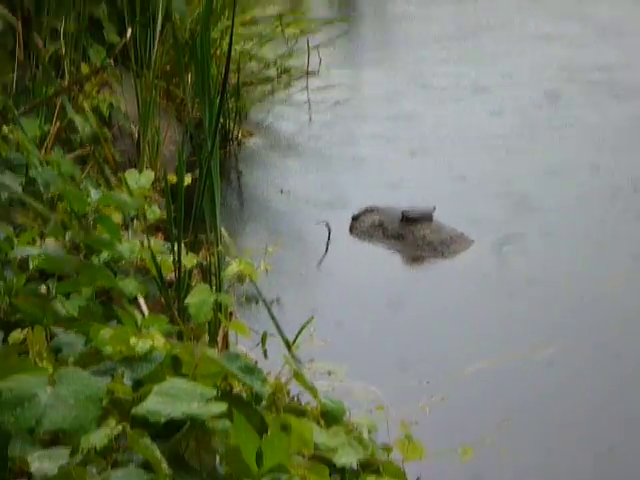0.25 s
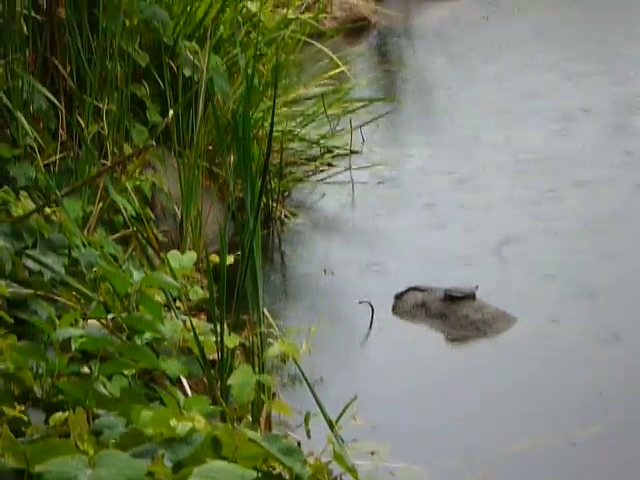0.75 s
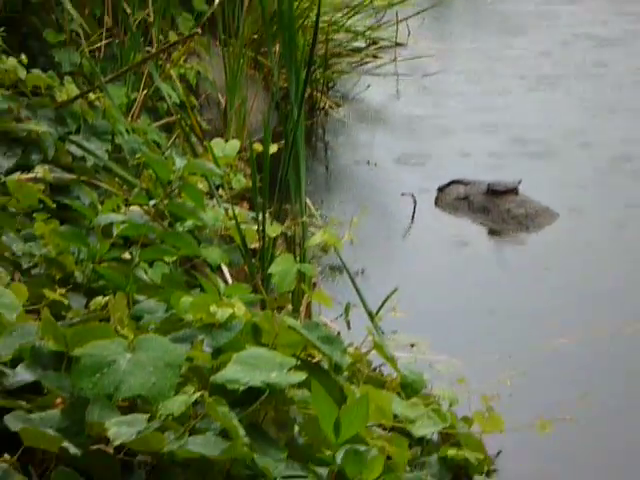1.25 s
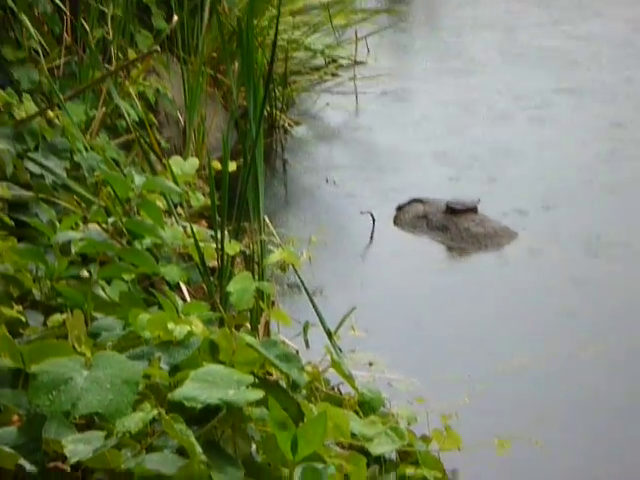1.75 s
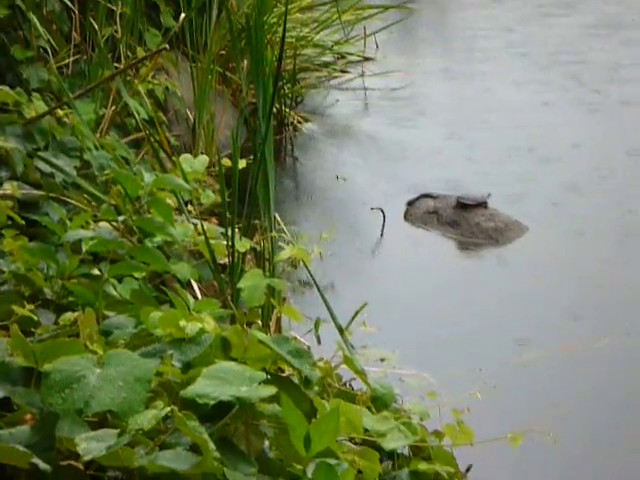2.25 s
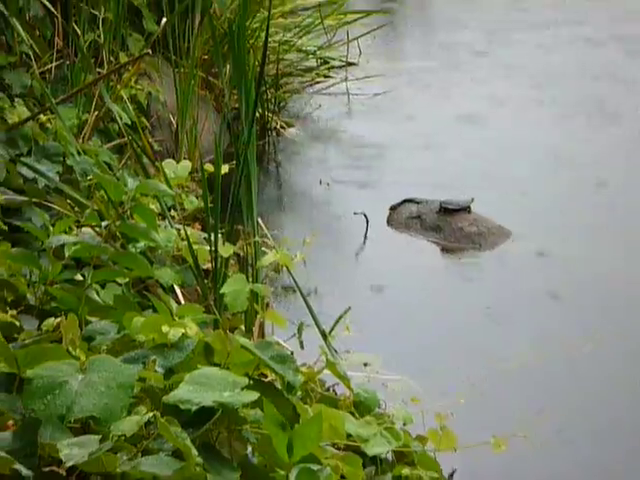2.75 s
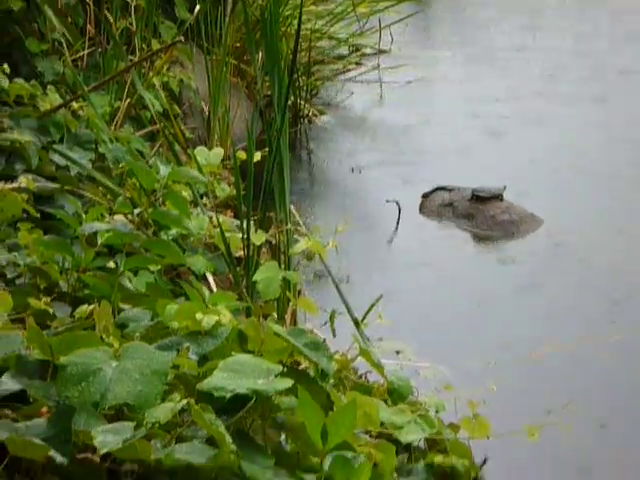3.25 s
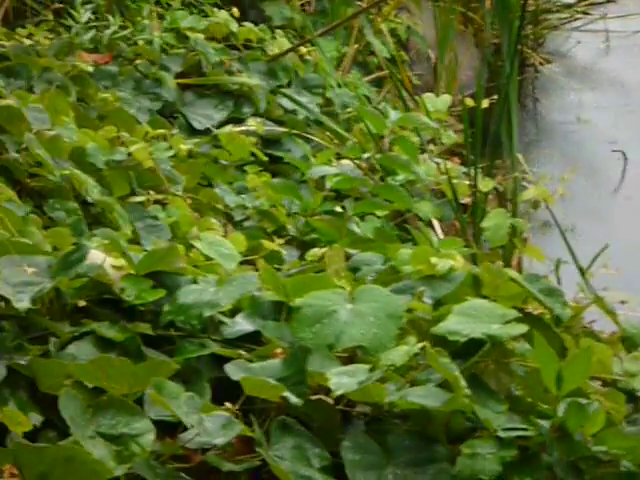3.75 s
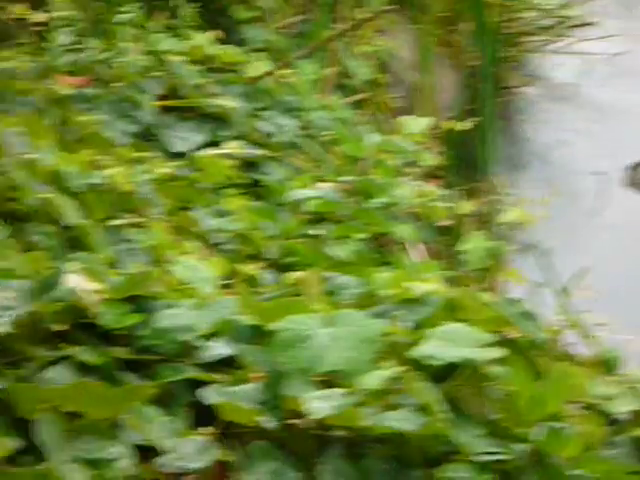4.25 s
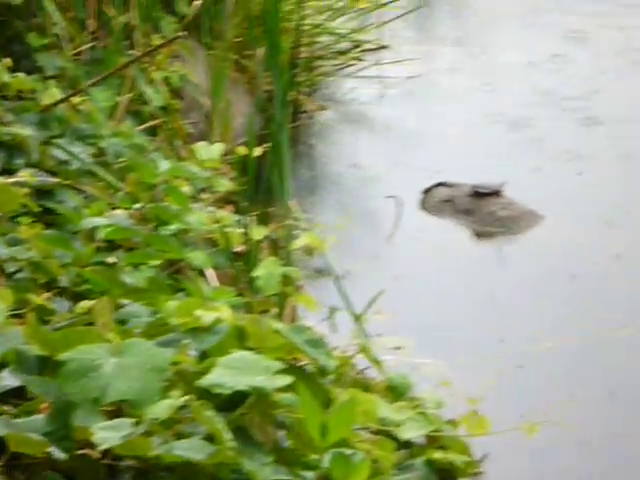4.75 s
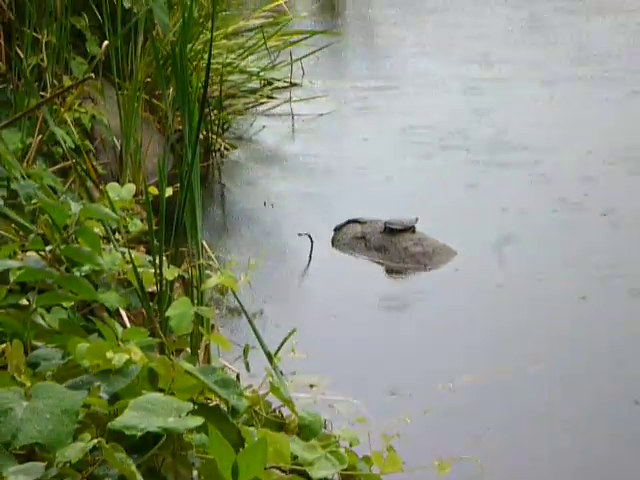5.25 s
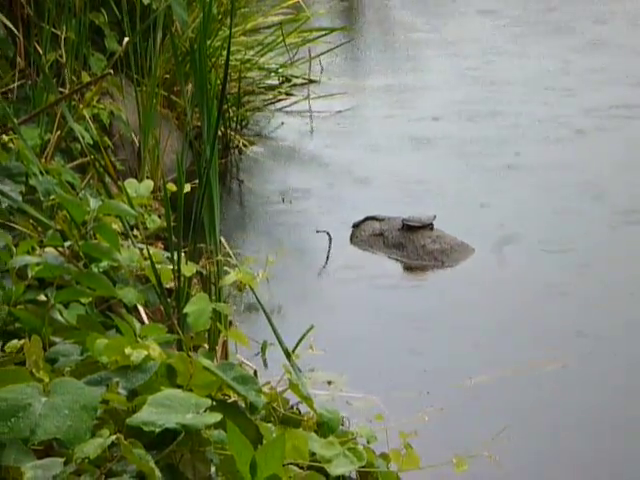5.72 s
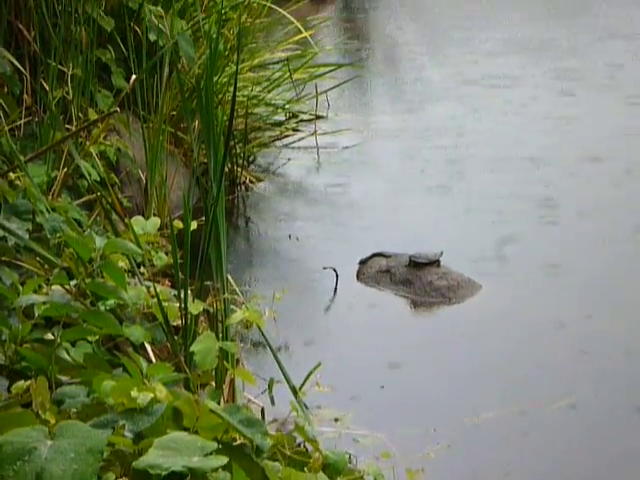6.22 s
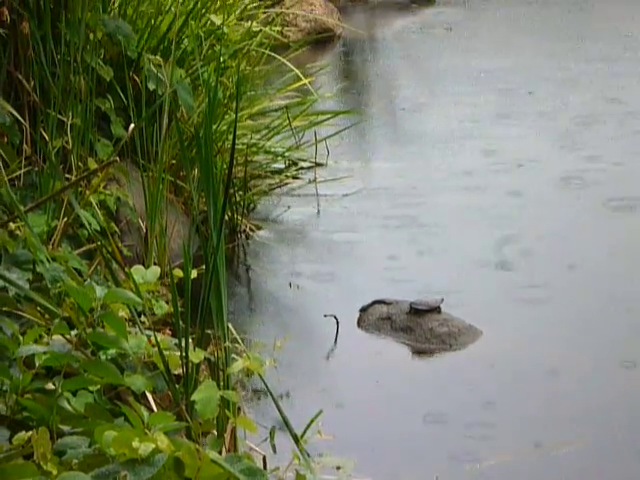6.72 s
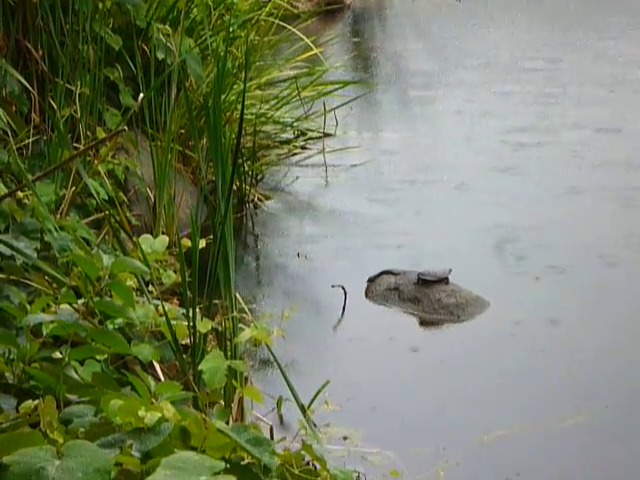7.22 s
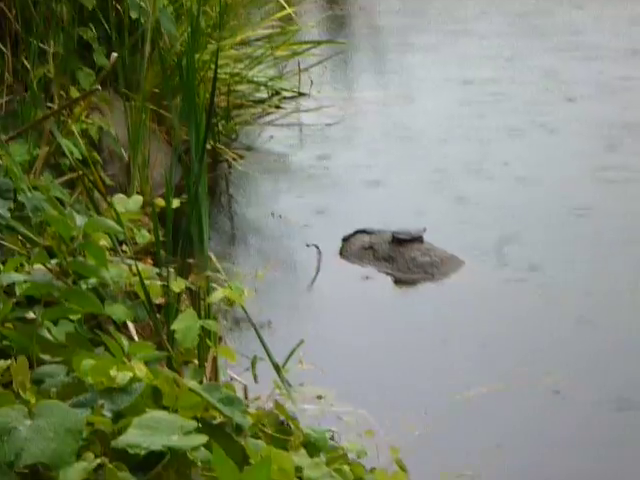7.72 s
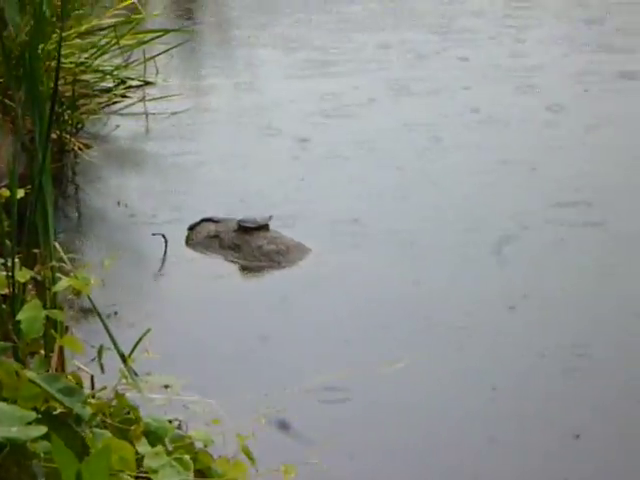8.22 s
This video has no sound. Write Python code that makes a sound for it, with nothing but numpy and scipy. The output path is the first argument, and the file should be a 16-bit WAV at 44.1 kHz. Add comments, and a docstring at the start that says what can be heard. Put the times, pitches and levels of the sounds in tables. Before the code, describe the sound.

Separate raindrops tick and tap on a taut umbrella just above the microphone, some light, some sharply loud, at an uneven pace throughout. Behind them, soft steady rain patters on a pond and its leafy bank. A brief plastic click comes close by early on, and the hardest drop lands just before the middle. A low distant rumble and hum, a thin insect trill and a few bird chips stay very faint.

```python
"""Raindrops tick on a taut cover, most likely an umbrella, just above a small mono camera by a pond.
Each drop strikes, rings its spot and sends waves back from the ribs; the hardest ducks the camera's gain.
Further out, steady rain patters on the water and the leafy bank, over a distant rumble, hum and drone,
a thin insect trill and a few faint bird chips. Close by, something plastic clicks in the hand."""
import sys
import numpy as np
from scipy import signal
from scipy.fft import rfft, irfft
from scipy.io import wavfile
from scipy.ndimage import uniform_filter1d

SR = 44100
rng = np.random.default_rng(int(sys.argv[2]) if len(sys.argv) > 2 else 0)


def file_out(sig):
    """Save sig as 16-bit WAV at sys.argv[1]."""
    # one column per channel
    cols = np.atleast_2d(sig).T
    # limit, then scale
    lim = np.clip(cols, -1, 1)
    pcm = np.round(lim * 32767).astype(np.int16)
    wavfile.write(sys.argv[1], SR, pcm)


N = 373968
TIME = np.arange(N) / SR

# the heaviest drops on the cover:
# (time [s], relative strength [dB], brightness [dB/octave], spot pitch [Hz], ring against the blow [dB])
HEAVY_DROPS = [(0.4236, -1.5, .5, 1310, -35), (0.7881, -10, -2.5, 670, -26), (1.0801, 1.5, .5, 730, -32),
               (1.107, -7.5, -1.5, 1460, -29), (1.411, -10.5, -.5, 1530, -33), (1.6724, -5, 3, 1600, -26),
               (1.7569, -6, -0.5, 3010, -43), (1.795, -7, -1.5, 1570, -37), (2.192, 0.5, -2, 1180, -32),
               (2.258, -9.5, -1.5, 1770, -39), (2.4258, -7, 1.5, 670, -19), (2.6789, -8.5, 0, 1310, -23),
               (2.7627, -6, .5, 1270, -26), (3.0488, -8.5, -1, 950, -32), (3.1, -5, -1.5, 1700, -30),
               (3.333, -4.5, -0.5, 1250, -37), (3.5292, 7.5, .5, 1250, -36),
               (3.7503, -6.5, -0.5, 1790, -29), (4.0598, -6, -1, 2840, -28), (4.1673, -1.5, -1, 880, -27),
               (4.2339, -1, -1, 2910, -43), (4.2415, -6, -2, 1610, -31), (4.256, -3.5, -0.5, 1570, -29),
               (4.48, -6, -1.5, 1490, -34), (4.5245, 1.5, -1, 900, -34), (4.6864, -10, -3, 2200, -24),
               (4.7527, -3.5, -.5, 1540, -21.5), (4.873, -2.5, 1.5, 3060, -37), (4.9438, -6, 1, 800, -23),
               (4.9501, -4, -2.5, 820, -31), (5.0077, -2.5, 0.5, 1400, -44), (5.1467, -9, -2.5, 2480, -35),
               (5.2212, -8.5, -2.5, 3010, -35), (5.289, -5, 0, 1310, -38), (5.3277, -4.5, 2.5, 800, -39),
               (5.3585, -11.5, 2.5, 1550, -29), (5.4582, -7.5, -1, 970, -31), (5.5777, -8.5, 2, 1340, -31),
               (5.6284, -2, -.5, 670, -33), (5.6864, -8, 2.5, 1400, -19), (5.7586, -3, 0, 1290, -31),
               (5.8479, -1.5, -1, 1140, -30), (6.0181, -5, -.5, 2240, -37), (6.0301, -6.5, -.5, 1140, -29),
               (6.0603, -7.5, -0.5, 1230, -28), (6.2463, -3, -.5, 1200, -28), (6.2721, -8.5, -1, 1340, -30),
               (6.3162, -9.5, 2, 1570, -40), (6.6078, -8.5, 3.5, 1230, -19), (6.8544, -12, -1, 880, -21),
               (7.0038, -8, -0.5, 2200, -40), (7.1733, -6, 0, 950, -28), (7.3273, -5.5, 0, 1810, -34),
               (7.4379, -2, -3, 2020, -47), (7.5959, -8.5, -1, 2630, -35), (7.7387, -8.5, 2, 860, -36),
               (7.8679, -4.5, -.5, 860, -43), (7.9145, -7.5, 2, 1250, -20), (7.954, 0, -2, 2000, -40),
               (8.1255, -8.5, -0.5, 1960, -36), (8.2637, -6.5, 0, 2500, -42), (8.3053, -6.5, -3, 1890, -37)]


def heavy_drops(gain_db):
    """The heaviest drops land just above the microphone, each on another spot of the cover."""
    out = np.zeros(N)
    for s, strength_db, tilt_db, ring_hz, ring_db in HEAVY_DROPS:
        add(out, s, drop(strength_db + gain_db, tilt_db, ring_hz, ring_db))
    return out


def lighter_drops(strength_db, spread_db, growth, companion_share, companion_s, count=32):
    """Lighter drops hit the cover at random, more often as the shower goes on, or beside a heavy one."""
    fallen = np.cumsum(np.linspace(1, growth, N))
    turns = (np.arange(count) + rng.random(count)) / count
    alone_s = np.interp(turns, fallen / fallen[-1], TIME)
    chance, lag = rng.random((len(HEAVY_DROPS), 2)).T
    beside_s = np.array(HEAVY_DROPS)[:, 0] + companion_s * (2 * lag - 1)
    out = np.zeros(N)
    for s in np.concatenate([alone_s, beside_s[chance < companion_share]]):
        tilt_db = rng.normal(-.24, 1.56)  # per octave
        ring_hz = 1370 * 2 ** rng.normal(0, .55)
        db = strength_db + rng.uniform(-spread_db, spread_db)
        add(out, s, drop(db, tilt_db, ring_hz, ring_db=-27.5))
    return out


def drop(strength_db, tilt_db, ring_hz, ring_db, ring_s=.0011, ripple_s=.00069, shiver_s=.02, size=1500):
    """One drop ticks and rings its spot; waves run back from the ribs and the cover shivers briefly."""
    t = np.arange(size) / SR
    ring = undb(ring_db) * np.cos(2 * np.pi * ring_hz * t) * np.exp(-t / ring_s)
    ripple = undb(-29.5) * t / ripple_s * np.exp(1 - t / ripple_s)
    shiver = undb(-44.5) * np.exp(-t / shiver_s)
    cover = ring + rng.standard_normal(size) * (ripple + shiver)
    cover[0] = 1  # the direct blow
    return undb(strength_db) * np.convolve(tick(tilt_db), cover)


def tick(tilt_db, pivot_hz=1800, size=512):
    """One sharp push and a slower rebound; a shorter contact is brighter (tilt_db per octave)."""
    # spectrum of a drop's impact: (frequency [Hz], relative level [dB])
    impact_spectrum = [(100, -20), (300, -4), (500, -3), (800, 0), (1400, 0.5), (2000, -1.5), (2800, -4),
                       (4000, -9), (6200, -11), (8000, -18.5)]
    hz = np.fft.rfftfreq(size, 1 / SR)
    db = shape_db(impact_spectrum, hz) + tilt_db * np.log2(np.maximum(hz, 600) / pivot_hz)
    # minimum phase packs the energy into the start
    cepstrum = irfft(np.log(undb(db)))
    cepstrum[1:size // 2] *= 2
    cepstrum[size // 2 + 1:] = 0
    return irfft(np.exp(rfft(cepstrum)))


def fine_drops(per_second, gain_db, splash_db, splash_s, size=400, spots=20):
    """Fine drops on the cover and the nearest leaves, from dull to bright, each with a tiny splash."""
    out, t = np.zeros(N), np.arange(size) / SR
    for tilt_db in np.linspace(-1.2, 3, spots):
        splash = undb(splash_db) * rng.standard_normal(size) * np.exp(-t / splash_s)
        splash[0] = 1  # the direct blow
        hits = impacts(per_second / spots, spread_db=7, range_db=7.5)
        out += signal.oaconvolve(hits, np.convolve(tick(tilt_db), splash))[:N]
    return out * undb(gain_db)


def plastic_clicks(slip_s, thump_hz, thump_db, thump_s, size=900):
    """In the hand, brief slips ring the modes of a plastic part; the first press also thumps its body."""
    # slips of the part: (time [s], peak level [dB])
    slips = [(1.6778, -12), (1.6941, -18), (1.7222, -34)]
    # modes of the plastic: (frequency [Hz], width [Hz], relative level [dB])
    modes = [(1650, 160, 1.5), (2420, 520, -1.5), (4410, 320, 8), (4820, 270, 2), (6500, 500, -15.5)]
    out, t = np.zeros(N), np.arange(size) / SR
    for s, peak_db in slips:
        scrape = rng.standard_normal(size) * t * np.exp(-t / slip_s)
        ring = sum(undb(db) * resonate(scrape, hz, width) for hz, width, db in modes)
        add(out, s, undb(peak_db) * ring / np.abs(ring).max())
    thump = undb(thump_db) * np.sin(2 * np.pi * thump_hz * t) * np.exp(-t / thump_s)
    add(out, slips[0][0] - .005, thump)
    return out


def far_rain(wash_db, patter_db):
    """Countless drops across pond and bank merge into a wash; the nearer ones still patter."""
    # spectrum of rain on water and leaves: (frequency [Hz], relative density [dB])
    rain_spectrum = [(60, -22), (200, -1.5), (500, 0), (850, 1.56), (1400, -2.5), (2000, -9), (3000, -13),
                     (4500, -17), (6800, -20), (8300, -24.5)]
    wash = colour(rng.standard_normal(N), rain_spectrum) * undb(.5 * walk(11))
    hits = impacts(per_second=2500, spread_db=6.5, range_db=24.5) * rng.choice([-1, 1], N)
    patter = colour(hits, rain_spectrum)
    return level(wash, wash_db) + level(patter, patter_db)


def rumble(rms_db):
    """A low rumble swells gently in the distance."""
    # spectrum of the rumble: (frequency [Hz], relative density [dB])
    rumble_spectrum = [(25, -32.5), (50, -10.5), (80, -4), (110, 1), (165, -1), (215, 0.5), (300, -0.5),
                       (480, -9), (900, -33)]
    noise = colour(rng.standard_normal(N), rumble_spectrum)
    return level(noise * undb(.56 * walk(6.6)), rms_db)


def hum(hz, width_hz, base_db):
    """A distant, wavering hum comes and goes."""
    # swell of the hum: (time [s], level against the base [dB])
    swell = [(0, -14), (1.1, 1), (2.0, -4), (3.3, -2), (3.9, 5), (4.4, -8.5), (8.4, -11)]
    s, db = np.transpose(swell)
    return level(noise_band(hz, width_hz), base_db) * undb(np.interp(TIME, s, db))


def drone(gain_db, waver_db):
    """A faint tone far off, perhaps an engine, wavers, sinks and fades."""
    # course of the drone: (time [s], pitch [Hz], relative level [dB])
    course = [(.4, 224, -69), (1.1, 216, -56.5), (2.1, 208, -65), (2.9, 194, -52), (3.3, 192, -78)]
    s, hz, db = np.transpose(course)
    tone = np.sin(2 * np.pi * np.cumsum(np.interp(TIME, s, hz)) / SR)
    return tone * undb(np.interp(TIME, s, db) + gain_db + waver_db * walk(8))


def bird(echo_db, echo_s, size=9000):
    """Short falling whistles reach the microphone with an echo scattered by the banks."""
    # bird chips: (time [s], length [s], start pitch [Hz], end pitch [Hz], direct peak level [dB])
    chips = [(.912, 0.035, 3200, 2700, -48), (1.309, 0.038, 3500, 2750, -47.5),
             (5.373, 0.0294, 2850, 2400, -45.5), (5.707, .03, 2830, 2600, -51)]
    direct = np.zeros(N)
    for s, length_s, start_hz, end_hz, db in chips:
        progress = np.linspace(0, 1, int(length_s * SR))
        phase = 2 * np.pi * np.cumsum(start_hz + (end_hz - start_hz) * progress) / SR
        add(direct, s, undb(db) * np.sin(np.pi * progress ** 2) * np.sin(phase))
    banks = rng.standard_normal(size) * np.exp(-np.arange(size) / SR / echo_s)
    echo = signal.fftconvolve(direct, banks / np.linalg.norm(banks))[:N]
    return direct + undb(echo_db) * echo


def insects():
    """Distant trills blur into narrow, steady bands."""
    # insect trills: (pitch [Hz], resonance width [Hz], rms level [dB])
    trills = [(6270, 180, -72.5), (6780, 170, -70.5)]
    return sum(level(noise_band(hz, width), db) for hz, width, db in trills)


def undb(db):
    """Decibels to gain."""
    return 10 ** (np.asarray(db) / 20)


def level(x, db):
    """Set the rms level."""
    return x * undb(db) / np.sqrt(np.mean(x ** 2))


def add(out, s, x):
    """Mix a short sound in at time s."""
    i = int(np.clip(s * SR, 0, N - 1))
    out[i:i + len(x)] += x[:N - i]


def shape_db(points, hz):
    """Read a spectrum on a log-frequency axis."""
    point_hz, db = np.transpose(points)
    return np.interp(np.log(hz + 1), np.log(point_hz), db)


def colour(x, points):
    """Give a long sound a spectrum."""
    return irfft(rfft(x) * undb(shape_db(points, np.fft.rfftfreq(N, 1 / SR))), N)


def resonate(x, hz, width_hz):
    """One resonance, gain 1 at its centre."""
    return signal.lfilter(*signal.iirpeak(hz, hz / width_hz, fs=SR), x)


def noise_band(hz, width_hz):
    """Noise passed twice through one resonance: an unsteady tone."""
    return resonate(resonate(rng.standard_normal(N), hz, width_hz), hz, width_hz)


def walk(per_second):
    """Random levels, each held briefly, then smoothed twice; spread near 1."""
    hold = int(SR / per_second)
    steps = np.repeat(rng.standard_normal(N // hold + 1), hold)
    return 1.3 * uniform_filter1d(uniform_filter1d(steps, hold), hold)[:N]


def impacts(per_second, spread_db, range_db):
    """Randomly timed impulses: many weak, few strong."""
    chance, size = rng.random(N), rng.random(N)
    size_db = -spread_db * np.log(1 - size * (1 - np.exp(-range_db / spread_db)))
    return (chance < per_second / SR) * undb(size_db - range_db)


def scene():
    """From under the cover: drops overhead, rain across the pond, faint life and rumble beyond; mono."""
    fine = fine_drops(per_second=44, gain_db=-13.5, splash_db=-22.5, splash_s=.0014)
    rain = far_rain(wash_db=-49.5, patter_db=-50)
    heavy = heavy_drops(gain_db=2)
    lighter = lighter_drops(strength_db=-10, spread_db=2.2, growth=1.8,
                            companion_share=.4, companion_s=.04)
    low = rumble(rms_db=-49.5) + hum(hz=131.9, width_hz=5.5, base_db=-57.5)
    low += drone(gain_db=2.5, waver_db=2.5)
    life = insects() + bird(echo_db=-1.5, echo_s=.07)
    clicks = plastic_clicks(slip_s=.00064, thump_hz=224, thump_db=-32, thump_s=.0094)
    return (heavy + lighter + fine + clicks + rain + low + life)[None]


def gain_control(x, limit_db, release_s):
    """A peak over the limit turns the gain down just after it; the gain then creeps back."""
    over_db = np.maximum(20 * np.log10(np.abs(x) + 1e-9) - limit_db, 0)
    fade = np.exp(-TIME / release_s)
    held_db = np.maximum.accumulate(over_db / fade, axis=-1) * fade
    duck_db = signal.lfilter(*signal.butter(1, 40, fs=SR), held_db)  # lags, so the peak slips through
    return x * undb(-duck_db)


def record(dry):
    """The camera rides its gain and cuts the top treble; its converter sits a little off zero."""
    ridden = gain_control(dry, limit_db=-9, release_s=.49)
    low_pass = signal.firwin(81, cutoff=8000, window=("kaiser", 7), fs=SR)
    dc_offset = -.052
    return signal.fftconvolve(ridden, low_pass[None], mode="same") + dc_offset


dry = scene()
out = record(dry)
file_out(out)
```